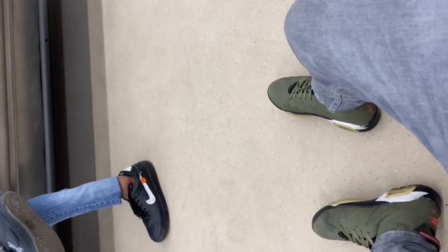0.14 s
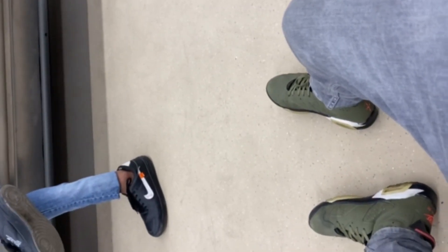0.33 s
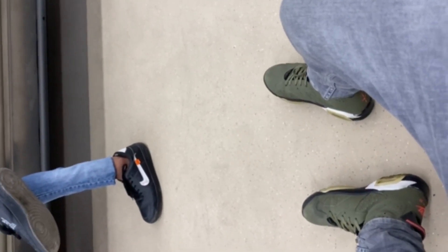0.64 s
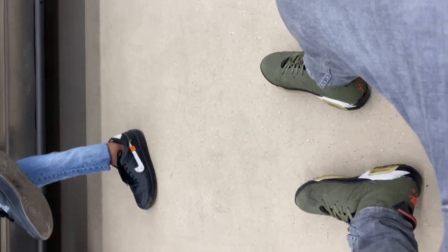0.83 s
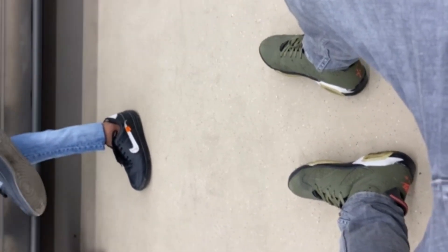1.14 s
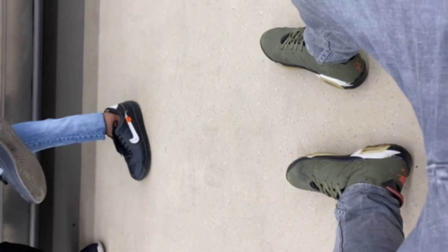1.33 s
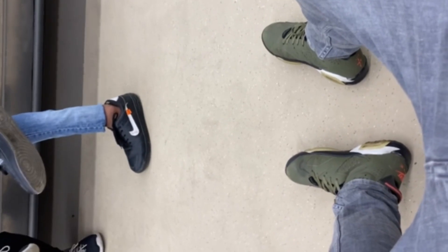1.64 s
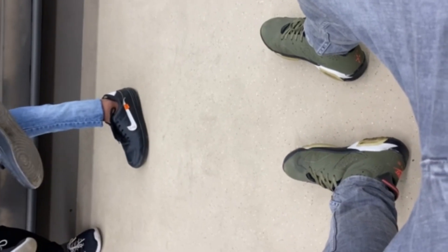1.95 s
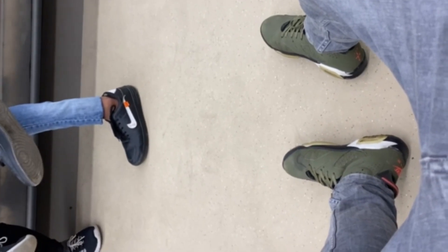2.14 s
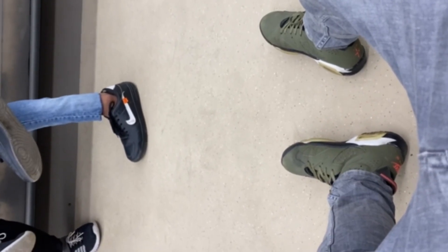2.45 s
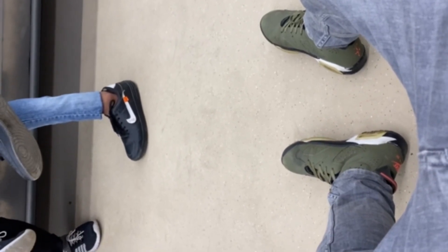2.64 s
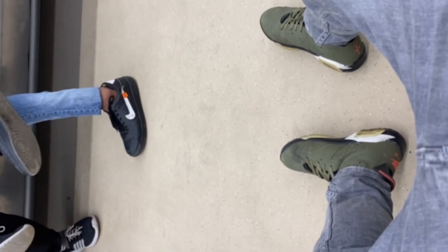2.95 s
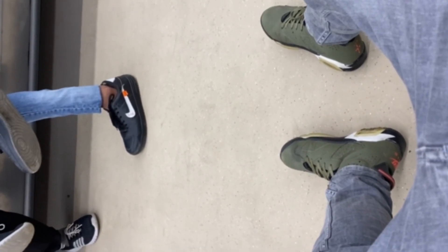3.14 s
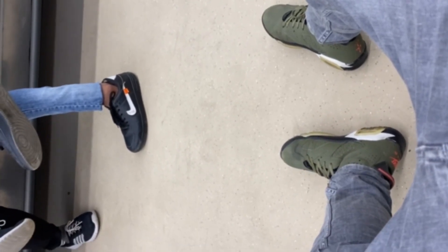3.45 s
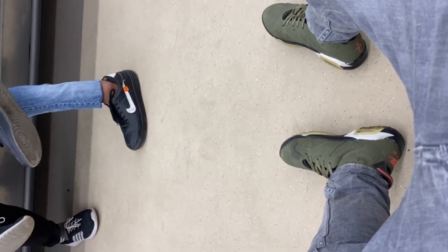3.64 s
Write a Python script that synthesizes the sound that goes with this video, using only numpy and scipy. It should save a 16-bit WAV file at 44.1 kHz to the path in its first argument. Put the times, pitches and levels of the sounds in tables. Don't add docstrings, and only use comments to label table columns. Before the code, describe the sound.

Steady metro train rumble from a passenger seat, close and enclosed, recorded in stereo on a phone: low floor booms, wavering hum, hollow panel resonance, faint metallic wheel ringing and occasional small puffs of air.

```python
import sys
import numpy as np
from scipy import signal
from scipy.fft import rfft, irfft
from scipy.io import wavfile
from scipy.ndimage import uniform_filter1d

SR = 44100
rng = np.random.default_rng(int(sys.argv[2]) if len(sys.argv) > 2 else 0)


def convert_level_to_amplitude(level_db):
    exponent = np.asarray(level_db, float) / 20
    return 10 ** exponent


def unload_wav(signal):
    wavfile.write(
        sys.argv[1],
        SR,
        np.round(np.clip(np.atleast_2d(signal).T, -1, 1) * 32767).astype(np.int16),
    )


N = 167580
T = np.arange(N) / SR
HZ = np.fft.rfftfreq(N, 1 / SR) + 1


def read(table, col=1):
    a = np.array(table)
    return np.interp(np.log(HZ), np.log(a[:, 0]), a[:, col])


def curve(table, col=1):
    a = np.array(table)
    return np.interp(T, a[:, 0], a[:, col])


def walk(rate):
    hold = int(SR / rate)
    steps = np.repeat(rng.standard_normal(N // hold + 1), hold)
    slewed = uniform_filter1d(uniform_filter1d(steps, hold), hold)
    return 1.3 * slewed[:N]


def port_gains():
    # frequency in Hz, left minus right in dB.
    lean = [(110, 0), (200, -.7), (1000, -1.5), (2200, -1), (3000, .1), (3800, .5), (4400, -1.2),
            (5300, .9), (7000, 0)]
    # frequency in Hz, phase by which the right port leads in radians.
    turn = [(0, 0), (900, 1.1), (1800, 5.4), (2400, 4), (3300, 4), (5200, 5.7), (7200, 3.14), (7900, 3),
            (10300, 0), (16000, -6.3)]
    lead = np.exp(1j * np.interp(HZ, *np.array(turn).T))
    return np.array([convert_level_to_amplitude(read(lean) / 2), convert_level_to_amplitude(-read(lean) / 2) * lead])


def ports():
    # frequency in Hz, likeness of the ports from 0 to 1.
    likeness = [(70, .9997), (170, .99), (380, .96), (650, .5), (1200, .16), (2000, .45), (4600, .55),
                (7600, .9), (9000, .75)]
    one, other = rfft(rng.standard_normal((2, N)))
    like = read(likeness)
    return np.array([one, like * one + np.sqrt(1 - like ** 2) * other]) * port_gains()


def coloured(field, gain, db):
    x = irfft(field * gain, N)
    return x * convert_level_to_amplitude(db) / np.sqrt(np.mean(x ** 2))


def closed(table):
    below = np.minimum(HZ / table[0][0], 1)
    above = np.minimum(table[-1][0] / HZ, 1)
    return convert_level_to_amplitude(read(table)) * below ** 6 * above ** 40


def swelling_noise(table, db, shared_db, own_db, rate):
    field = ports() * closed(table)
    field = field * convert_level_to_amplitude(db) / np.sqrt(np.mean(irfft(field, N) ** 2))
    swell = walk(7.7)
    lowest = np.floor(2 * np.log2(table[0][0])) - 1
    out = 0
    for centre in np.arange(lowest, 2 * np.log2(table[-1][0]) + 2):
        mask = np.cos(np.pi / 2 * np.clip(2 * np.log2(HZ) - centre, -1, 1)) ** 2
        out = out + irfft(field * mask, N) * convert_level_to_amplitude(shared_db * swell + own_db * walk(rate))
    return out


def rings(modes, flicker_db, rate, gain_db):
    field = ports()
    out = 0
    for hz, width, db in modes:
        resonance = (1 + (2 * (HZ - hz) / width) ** 2) ** -.7
        out = out + coloured(field, resonance, db + gain_db) * convert_level_to_amplitude(flicker_db * walk(rate))
    return out


def rolling():
    # frequency in Hz, density in dB per Hz.
    rumble = [(22, -24), (30, -9), (40, -5.5), (56, -1.5), (70, -4), (92, -14.5), (190, -11.5),
              (260, -21.5)]
    # frequency in Hz, density in dB per Hz.
    roar = [(220, -13), (330, -3), (480, -6.5), (620, -11.5), (850, -7), (1350, -16.5), (3800, -30),
            (7400, -43), (9600, -50)]
    return (swelling_noise(rumble, db=-25.5, shared_db=0.34, own_db=0.72, rate=6)
            + swelling_noise(roar, db=-31, shared_db=0.4, own_db=1.47, rate=11))


def ringing_cabin():
    # frequency in Hz, width in Hz, level in dB.
    cabin_modes = [(103.3, 6.2, -42), (124.8, 15, -41), (342.4, 47, -39.5), (410, 38, -50),
                   (453.7, 15, -42.5), (528, 58, -47.5), (729, 61, -40.5)]
    # time in seconds, level in dB.
    shake = [(0, 2), (.4, -0.5), (.8, 0.5), (1.2, -0.5), (1.6, 0.5), (1.9, -1), (2.15, 3.5), (2.45, -3),
             (2.8, -0.5), (3.0, 1.5), (3.3, 0), (3.6, 1), (3.8, 0.5)]
    return rings(cabin_modes, flicker_db=2.3, rate=8.01, gain_db=0.1) * convert_level_to_amplitude(curve(shake))


def ringing_rims():
    # frequency in Hz, width in Hz, level in dB.
    wheel_modes = [(1930, 90, -51.5), (2060, 120, -55), (2520, 12, -65), (2585, 60, -55), (2850, 70, -58),
                   (3104, 10, -69), (3272, 14, -63), (3330, 14, -63), (3400, 110, -62.5), (4135, 16, -68),
                   (4200, 65, -62), (5190, 120, -65.5), (5420, 300, -66), (6150, 250, -70)]
    # time in seconds, level in dB.
    rim_drive = [(0, 0), (.3, -0.5), (.6, 2.5), (.85, 0), (1.3, 1.5), (1.9, -2), (2.3, 2), (2.7, -2),
                 (3.0, 0.5), (3.2, 0.5), (3.4, -4), (3.8, 1)]
    return rings(wheel_modes, flicker_db=1.9, rate=18, gain_db=0.36) * convert_level_to_amplitude(curve(rim_drive))


def wheels():
    # time in seconds, level in dB.
    roughness = [(0, -1), (.6, -1), (1.2, 0), (1.8, 0), (2.3, 1), (2.8, 0), (3.2, 1), (3.8, .5)]
    return (rolling() + ringing_cabin() + ringing_rims()) * convert_level_to_amplitude(curve(roughness))


def boom():
    # time in seconds, level in dB.
    floor_drive = [(0.0, -32), (0.05, -25.5), (0.2, -45), (0.31, -29), (1.35, -26.5), (1.44, -48),
                   (1.53, -20.5), (1.82, -35.5), (1.98, -27), (3.26, -27), (3.38, -38.5), (3.45, -21),
                   (3.62, -28), (3.66, -50), (3.72, -27.5), (3.8, -29)]
    pitch_hz = 79.3 + 3 * walk(14)
    return np.sqrt(2) * convert_level_to_amplitude(curve(floor_drive) - 0.5) * np.sin(2 * np.pi * np.cumsum(pitch_hz) / SR)


def hum():
    # time in seconds, pitch in Hz, level in dB.
    motor = [(0.0, 198.5, -26.5), (0.69, 198.3, -29.5), (0.8, 199, -22.5), (1.12, 198, -29.5),
             (1.28, 197, -22.5), (1.61, 198.4, -29), (1.73, 198.6, -21), (2.07, 198.4, -30),
             (2.31, 198.3, -24), (2.42, 199.1, -29.5), (2.6, 198.5, -23.5), (2.79, 198.5, -24.5),
             (2.95, 197.2, -41), (3.12, 198.6, -20.5), (3.42, 197.7, -28), (3.5, 197.8, -21.5),
             (3.7, 197, -26), (3.8, 192, -33.5)]
    wobble_db, pan_db, phase_rad = 1.17, -1, -.26
    phase = 2 * np.pi * np.cumsum(curve(motor) + .5 * walk(15)) / SR
    side = np.array([[.5], [-.5]])
    level_db = curve(motor, col=2) + wobble_db * walk(5.7) + side * pan_db
    return np.sqrt(2) * convert_level_to_amplitude(level_db) * np.sin(phase + side * phase_rad)


def flares(table, gain_db, wander_hz, flicker_db):
    edge_s = 0.0062
    drift = 2 * np.pi * np.cumsum(wander_hz * walk(40)) / SR
    out = 0
    for at, length, db, hz in table:
        edge = np.clip(np.minimum(T - at, at + length - T) / edge_s / 2 + .5, 0, 1)
        tone = np.sin(2 * np.pi * hz * T + drift)
        out = out + convert_level_to_amplitude(db) * np.sin(np.pi / 2 * edge) ** 2 * tone
    flickering = out * convert_level_to_amplitude(gain_db + flicker_db * walk(29.76))
    return irfft(rfft(flickering) * port_gains(), N)


def surges():
    # start in seconds, length in seconds, level in dB, pitch in Hz.
    bogie_surges = [(0.282, 0.042, -20.5, 51.9), (0.607, 0.038, -21, 53.5), (0.694, 0.051, -20, 52.1),
                    (0.917, 0.065, -18.5, 52.4), (1.526, 0.092, -27, 53.2), (1.741, 0.076, -23.5, 52.6),
                    (2.137, 0.074, -20, 53.3), (2.303, 0.044, -24.5, 54.3), (2.961, 0.052, -19, 52.4),
                    (3.035, 0.038, -20, 53.7), (3.237, 0.057, -22.5, 52.8), (3.322, 0.042, -23, 52.1),
                    (3.492, 0.21, -25, 53.2)]
    return flares(bogie_surges, 0.3, wander_hz=2.85, flicker_db=0.5)


def cabin_swells():
    # start in seconds, length in seconds, level in dB, pitch in Hz.
    cabin = [(0.152, 0.074, -29.5, 344), (1.012, 0.06, -31.5, 337), (1.091, 0.091, -32, 333),
             (1.28, 0.036, -30, 327), (1.43, 0.038, -29.5, 329.8), (1.63, 0.055, -30, 338),
             (1.96, 0.029, -27, 340), (2.093, 0.07, -33, 347), (2.798, 0.3, -33, 341.5),
             (3.295, 0.086, -27.5, 346.2), (3.54, 0.08, -33.5, 328), (3.622, 0.066, -30.5, 332),
             (3.751, 0.052, -30.5, 345)]
    # start in seconds, length in seconds, level in dB, pitch in Hz.
    panels = [(1.351, 0.042, -36, 739), (1.527, 0.033, -34, 741), (2.006, 0.028, -29, 739),
              (2.121, 0.04, -31, 744), (2.262, 0.034, -32, 739), (2.431, 0.118, -36, 743),
              (2.601, 0.066, -33, 742), (3.17, 0.1, -33.5, 739), (3.686, 0.078, -32.5, 744)]
    return (flares(cabin, 0.1, wander_hz=12.1, flicker_db=2.5)
            + flares(panels, 0.2, wander_hz=13.1, flicker_db=2.0))


def singing_rims():
    # start in seconds, length in seconds, level in dB, pitch in Hz.
    lower_mode = [(0.027, 0.03, -56, 2570), (0.27, 0.08, -51, 2560), (0.51, 0.084, -55, 2640),
                  (0.608, 0.13, -52, 2590), (0.73, 0.04, -50, 2600), (0.867, 0.048, -58, 2540),
                  (1.007, 0.09, -57, 2590), (1.146, 0.054, -55, 2570), (1.27, 0.05, -51, 2590),
                  (1.4, 0.09, -52, 2580), (1.522, 0.022, -57, 2560), (1.59, 0.078, -52, 2580),
                  (1.694, 0.031, -47, 2590), (1.788, 0.082, -51, 2590), (2.024, 0.085, -58, 2600),
                  (2.204, 0.03, -58, 2570), (2.344, 0.036, -50, 2560), (2.693, 0.13, -51, 2570),
                  (2.864, 0.042, -52, 2600), (2.926, 0.065, -58, 2560), (3.016, 0.05, -61, 2570),
                  (3.084, 0.034, -56, 2620), (3.138, 0.12, -44.5, 2556), (3.403, 0.088, -54, 2590),
                  (3.569, 0.072, -52, 2600), (3.756, 0.04, -45, 2500)]
    # start in seconds, length in seconds, level in dB, pitch in Hz.
    upper_mode = [(0.071, 0.066, -51, 3320), (0.21, 0.042, -49, 3310), (0.372, 0.04, -50, 3340),
                  (0.56, 0.073, -60, 3340), (0.736, 0.044, -55, 3340), (0.825, 0.07, -52, 3340),
                  (1.418, 0.046, -53, 3330), (1.495, 0.032, -58, 3360), (1.6, 0.046, -52, 3310),
                  (2.05, 0.05, -60, 3320), (2.274, 0.069, -50, 3330), (2.67, 0.082, -55, 3350),
                  (3.024, 0.065, -50, 3360), (3.167, 0.032, -55, 3370), (3.737, 0.094, -53, 3370)]
    return (flares(lower_mode, 7.1, wander_hz=21.04, flicker_db=2.8)
            + flares(upper_mode, 3.4, wander_hz=34.1, flicker_db=4.0))


def valve():
    # peak time in seconds, level in dB, attack in seconds, release in seconds, fullness in dB.
    puffs = [
        (.07, -52, 0.029, 0.078, -7.5),
        (.47, -67.5, 0.022, .03, 0),
        (0.696, -44, 0.0028, 0.037, -8.5),
        (0.76, -57, 0.017, .04, -7.5),
        (3.3, -64, 0.055, 0.09, -9.5),
        (3.56, -57.5, 0.15, 0.1, -9),
        (3.742, -47, 0.022, 0.2, 0),
        (3.795, -55, 0.03, .05, 1),
    ]
    # frequency in Hz, density in dB per Hz.
    jet = [(6000, -7), (7000, -3), (8500, 1.5), (10500, -3.5), (12000, -6.5), (13500, -9.5), (14500, -18),
           (15700, -25)]
    # frequency in Hz, density in dB per Hz.
    jet_low = [(2000, -8), (3500, 1.5), (5000, -4), (6500, -4.5), (7500, -8)]
    high, low = 0, 0
    for at, db, rise, fall, fullness_db in puffs:
        shape = convert_level_to_amplitude(db) * np.exp(np.where(T < at, (T - at) / rise, (at - T) / fall))
        high = high + shape
        low = low + shape * convert_level_to_amplitude(fullness_db)
    field = ports()
    air = coloured(field, closed(jet), 0) * high + coloured(field, closed(jet_low), 0) * low
    return air * convert_level_to_amplitude(.7 * walk(60))


def ventilation():
    # frequency in Hz, density in dB per Hz.
    grille = [(6000, -2), (8000, -1), (10000, -3), (12400, -7.5), (13300, -15), (14300, -25)]
    return swelling_noise(grille, db=-67, shared_db=.6, own_db=0.65, rate=8.3)


def scene():
    train = wheels() + boom() + hum()
    moments = surges() + cabin_swells() + singing_rims()
    return train + moments + valve() + ventilation()


def top_cut(x):
    return signal.sosfilt(signal.butter(12, 15700, fs=SR, output="sos"), x)


def record(dry):
    # low edge in Hz, high edge in Hz.
    mid_gaps = [(6900, 7850), (12850, 14500)]
    # low edge in Hz, high edge in Hz.
    side_gaps = [(9750, 11700)]
    squash, margin, fade_s = 1.2, 2048, .001
    squashed = np.tanh(squash * dry) / squash
    padded = np.pad(squashed, ((0, 0), (margin, margin)), mode="reflect", reflect_type="odd")
    hz = np.fft.rfftfreq(padded.shape[1], 1 / SR)
    mid, side = rfft(padded[0] + padded[1]), rfft(padded[0] - padded[1])
    for spectrum, gaps in ((mid, mid_gaps), (side, side_gaps)):
        for low, high in gaps:
            spectrum[(hz >= low) & (hz <= high)] = 0
    kept = irfft(np.array([mid + side, mid - side]) / 2, padded.shape[1])[:, margin:-margin]
    ends = np.minimum(np.arange(N), np.arange(N)[::-1]) / SR / fade_s
    return top_cut(kept * np.sin(np.pi / 2 * np.minimum(ends, 1)) ** 2)


dry = scene()
out = record(dry)
unload_wav(out)
```